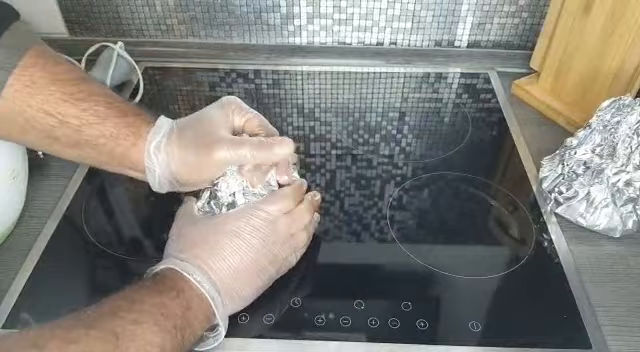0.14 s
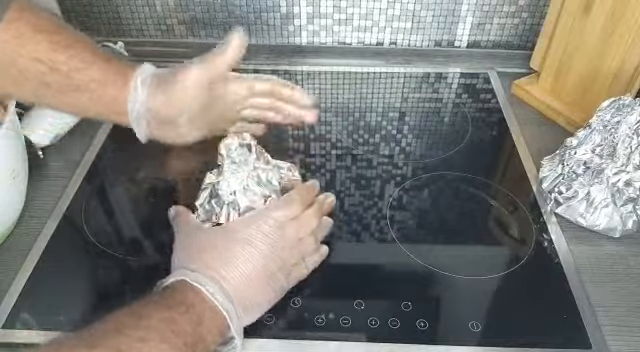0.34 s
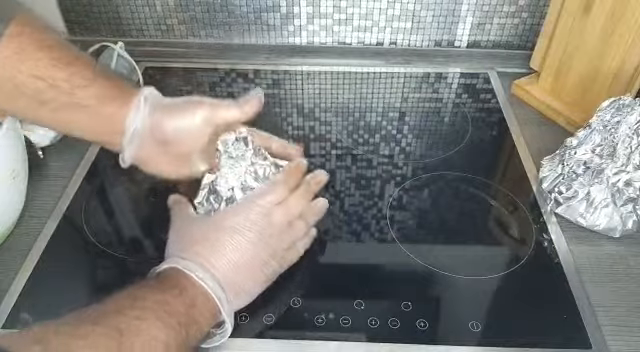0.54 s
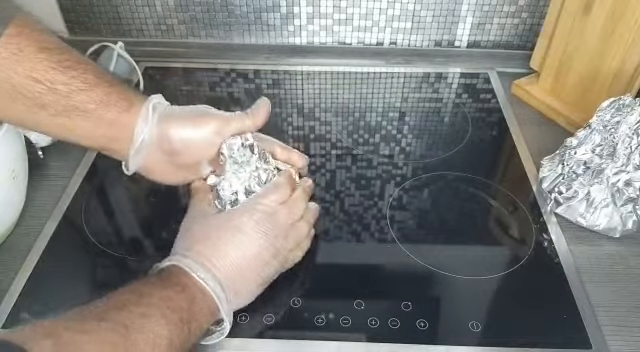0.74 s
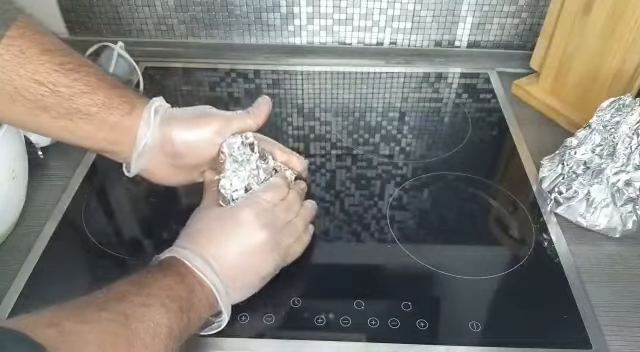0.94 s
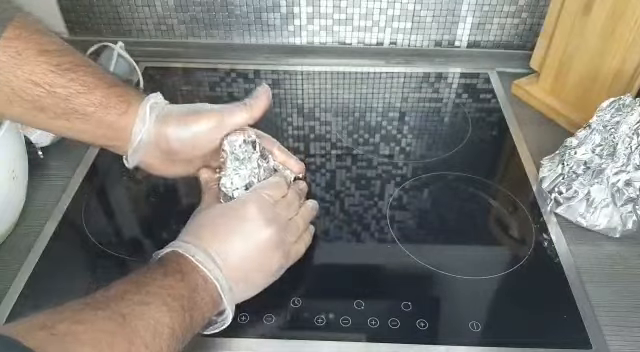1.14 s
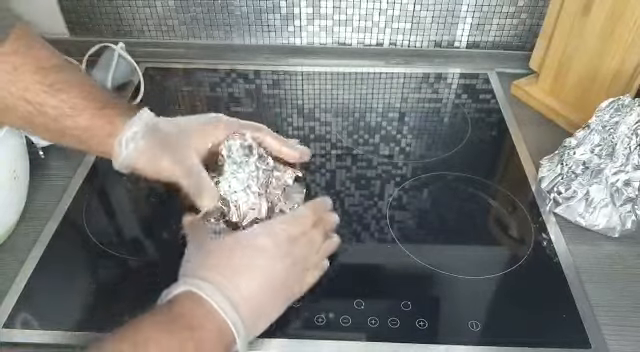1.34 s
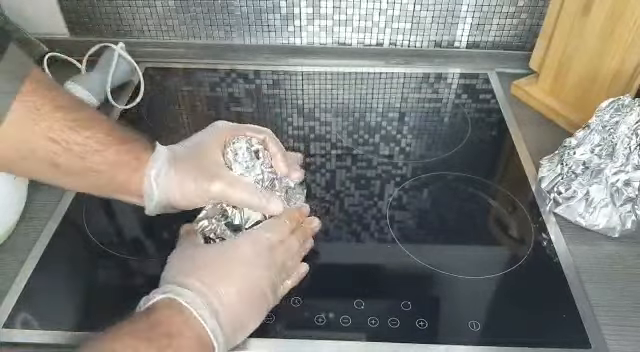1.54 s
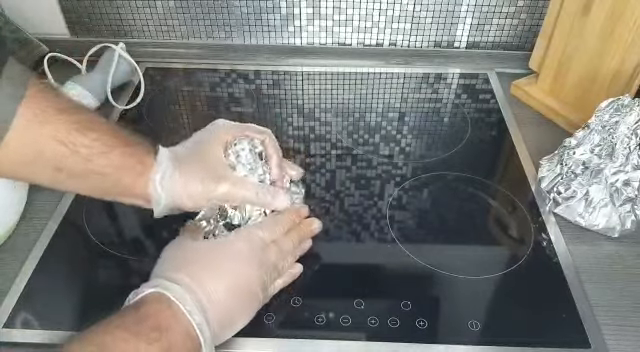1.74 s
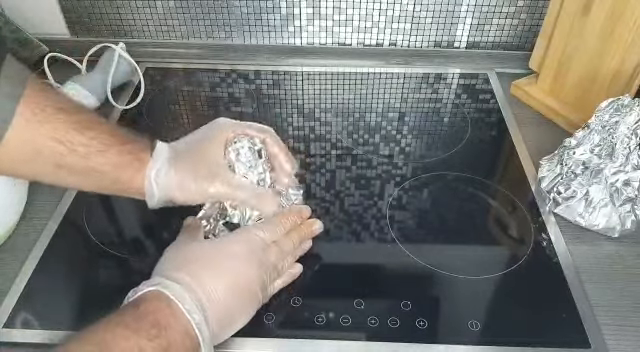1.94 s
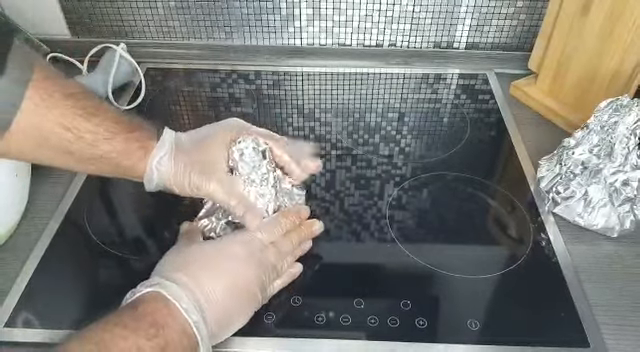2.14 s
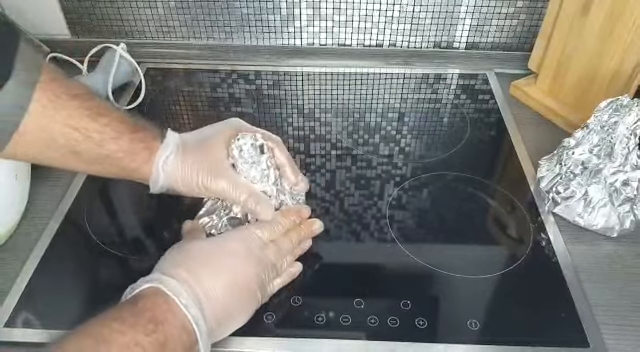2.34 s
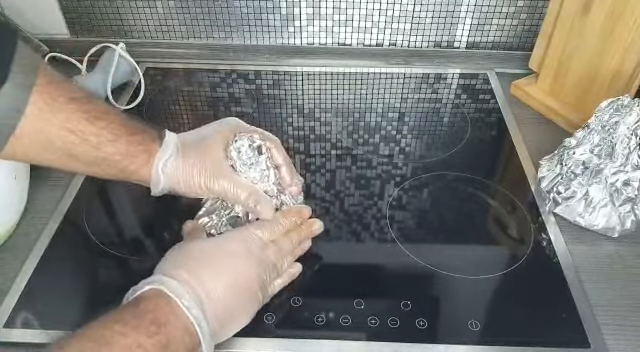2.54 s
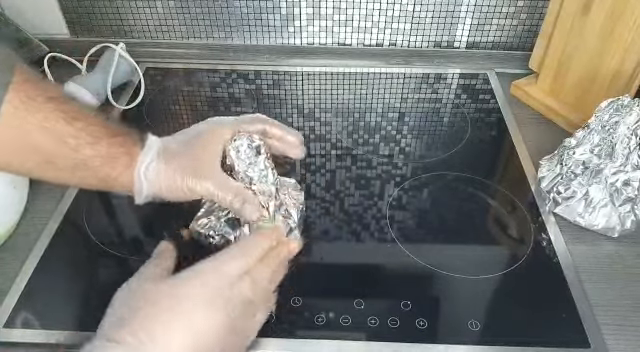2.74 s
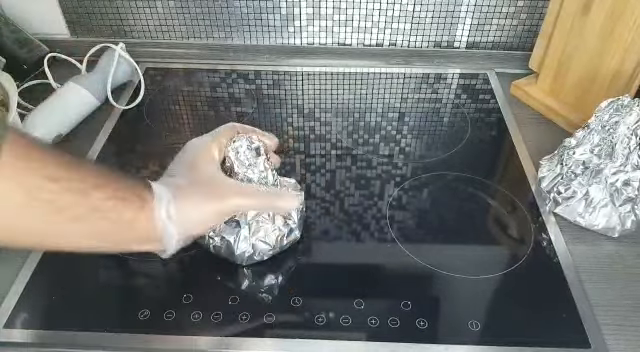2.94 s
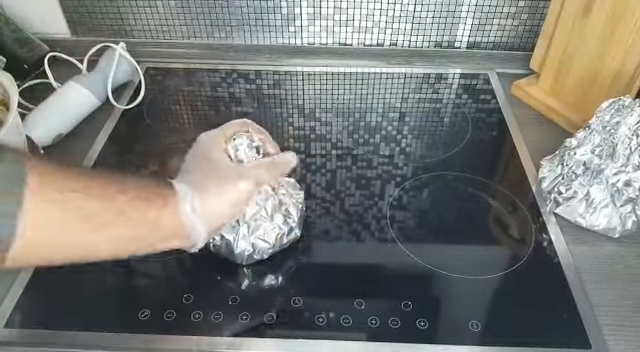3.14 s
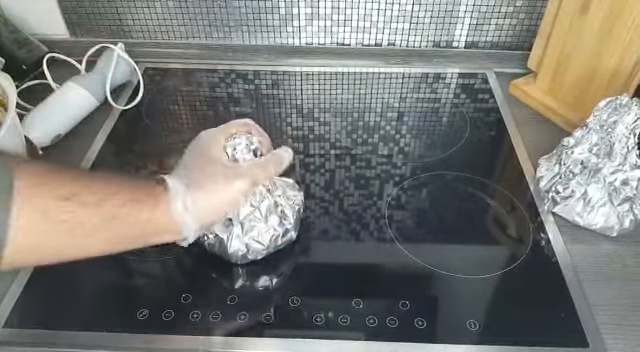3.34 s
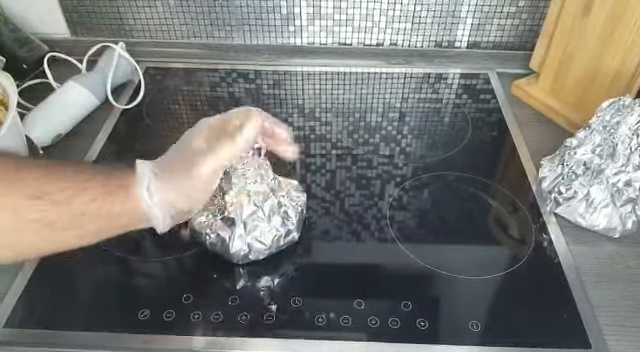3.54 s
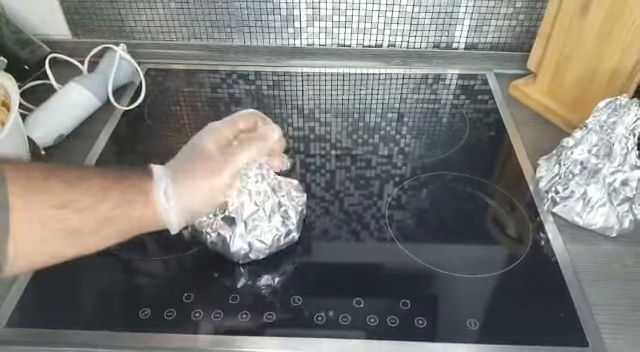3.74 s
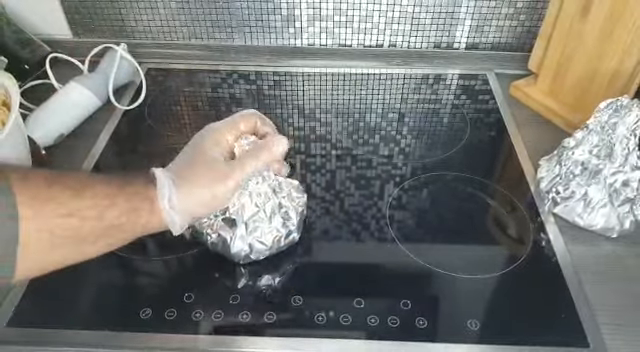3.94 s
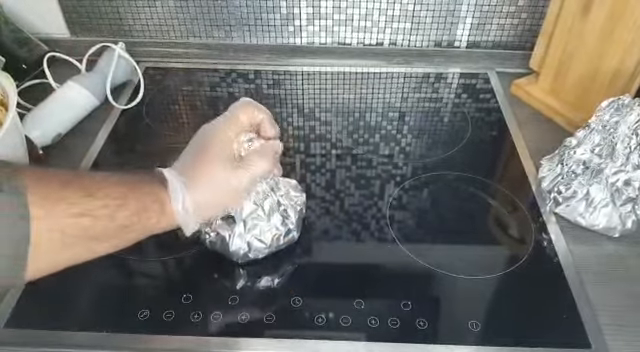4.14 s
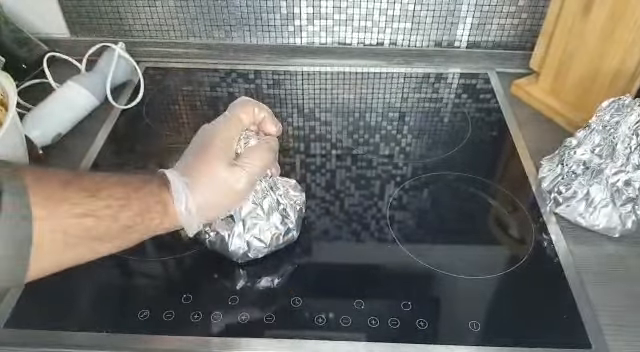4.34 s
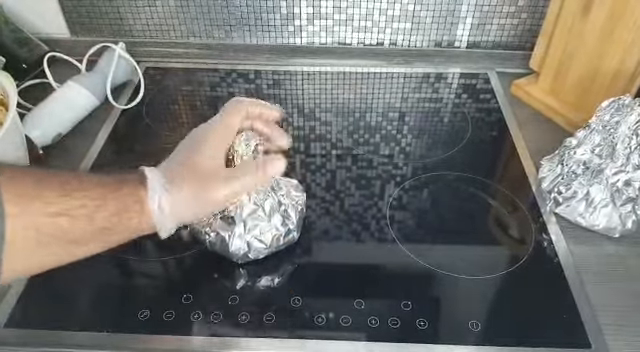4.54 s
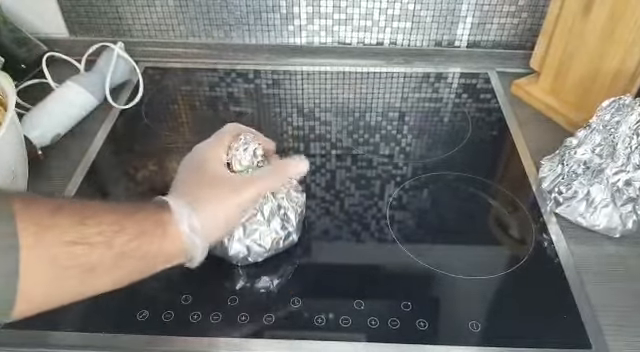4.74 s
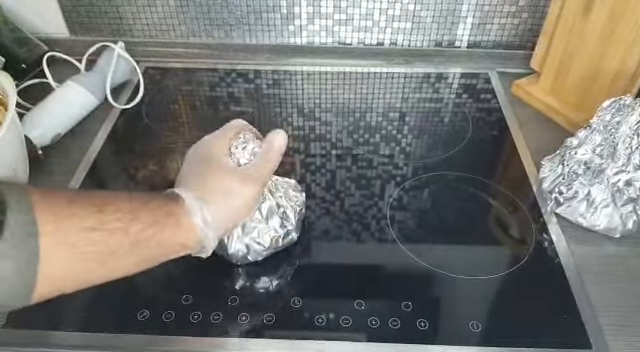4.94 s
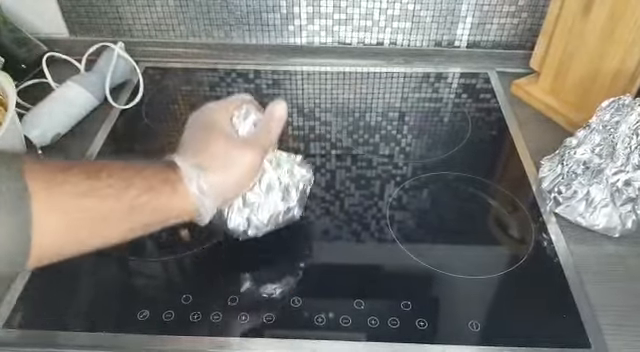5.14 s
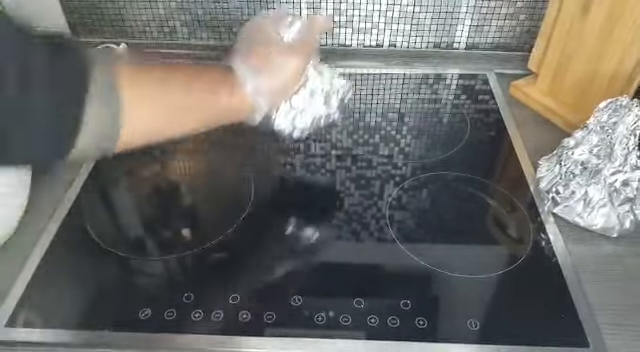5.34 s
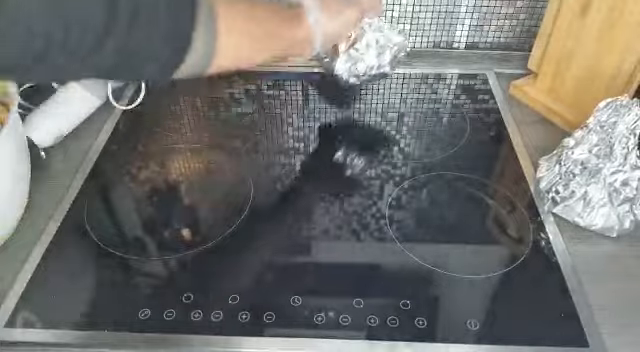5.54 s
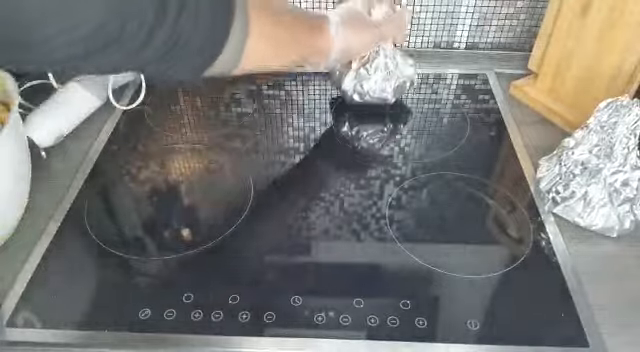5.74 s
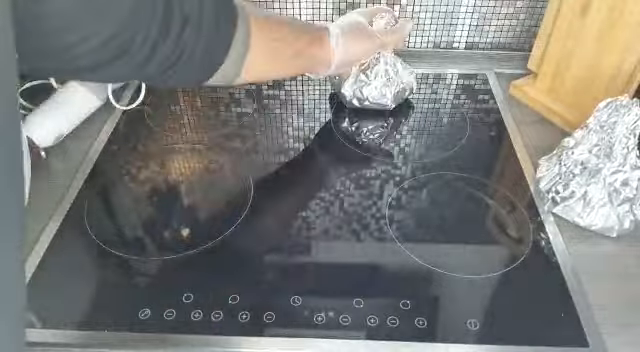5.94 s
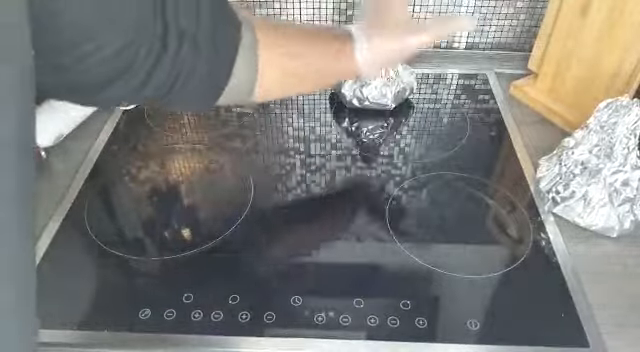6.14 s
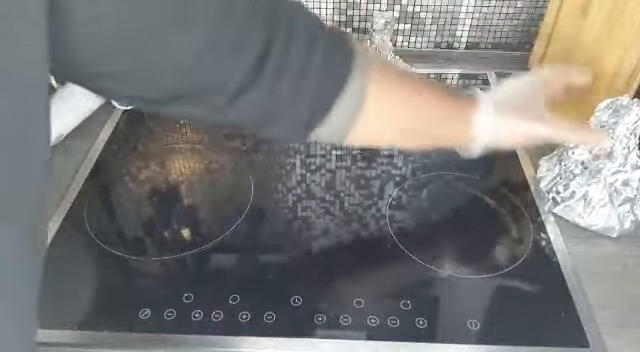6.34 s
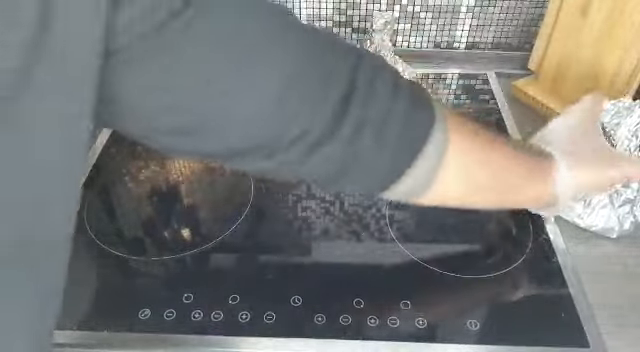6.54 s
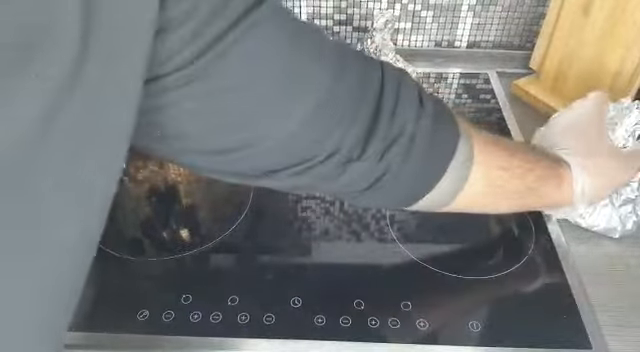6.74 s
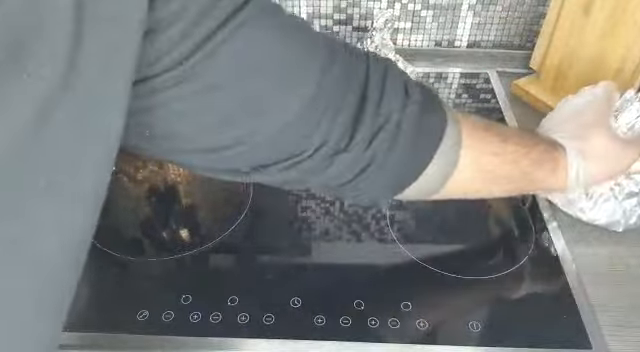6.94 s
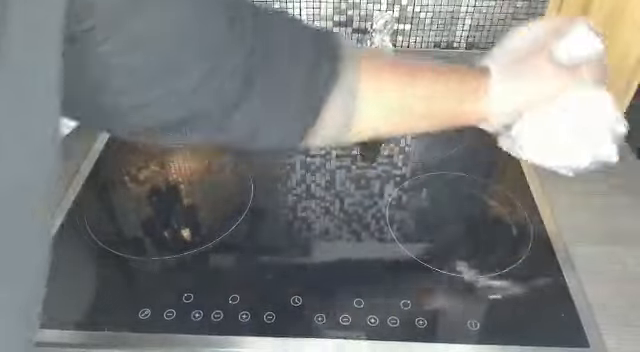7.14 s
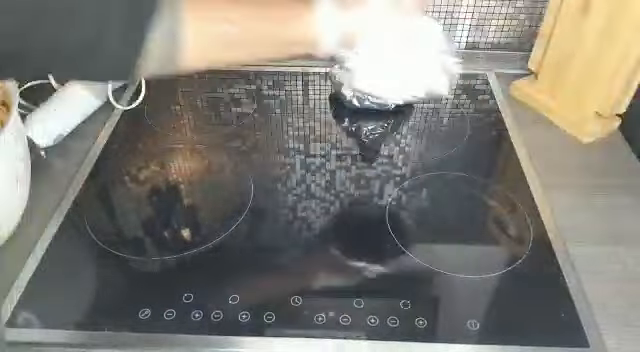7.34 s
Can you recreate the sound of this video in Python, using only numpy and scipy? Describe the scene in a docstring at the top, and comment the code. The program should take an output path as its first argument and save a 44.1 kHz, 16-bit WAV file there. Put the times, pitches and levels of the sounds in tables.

```python
"""A small kitchen: gloved hands press aluminium foil around food on a glass hob, before two microphones.
From the start, tiny facets crackle, whole creases snap, loose sheet flaps and hollows pop, over steady noise
with two faint bands that vary; the hob rumbles under the hands.
Near 5.9 s the parcel lands with one low thump that rings the hob's modes; then a second parcel is picked up
on the right, shifted by delay and balance. Reflections follow; the microphone and recorder limit the band."""
import sys
import numpy as np
from scipy import signal
from scipy.fft import rfft, irfft, next_fast_len
from scipy.io import wavfile
from scipy.ndimage import uniform_filter1d, map_coordinates

SR = 44100
rng = np.random.default_rng(int(sys.argv[2]) if len(sys.argv) > 2 else 0)


def wav_out(sig):
    """Save sig, one row per channel (or a flat mono array), as 16-bit PCM at SR to the path in sys.argv[1]."""
    wavfile.write(sys.argv[1], SR, np.round(np.clip(np.atleast_2d(sig).T, -1, 1) * 32767).astype(np.int16))


N = 325899

# steady background noise: (frequency [Hz], relative density [dB per Hz])
HUSH_SPECTRUM = [(20, -15.5), (35, -2), (65, -4), (130, -5), (200, -18), (320, -10.5), (600, -23.5),
                 (2700, -37), (13000, -30), (16000, -34)]
# faint narrow band of noise near 2.2 kHz: (frequency [Hz], relative density [dB per Hz])
HIGH_BAND_SPECTRUM = [(100, -6), (300, -14.5), (700, -28.5), (1600, -21.5), (2000, -10.5), (2200, 2.5),
                      (2450, -7.5), (2800, -23), (16000, -14.5)]
# its rise and fall in the background: (time [s], level [dB])
HIGH_BAND_LEVEL = [(0, -62), (1.5, -69), (3, -65), (4.3, -68.5), (4.8, -88), (5.8, -75.5), (6.3, -93.5),
                   (6.6, -91), (7.39, -72.5)]
# faint low band of noise near 410 Hz: (frequency [Hz], relative density [dB per Hz])
LOW_BAND_SPECTRUM = [(150, -27), (240, -7), (330, -10.5), (410, 2), (480, -3), (580, -22.5), (900, -23)]
# how it swells and fades: (time [s], level [dB])
LOW_BAND_LEVEL = [(0.4, -74), (1.0, -61), (1.4, -62), (1.7, -84), (2.6, -86), (3.1, -70.5), (3.7, -85),
                  (3.95, -73.5), (4.15, -59.5), (4.55, -68), (4.8, -88), (5.8, -73.5), (6.3, -91),
                  (7.39, -78.5)]
# how long the room rings: (frequency [Hz], t60 [s])
ROOM_T60 = [(80, 0.37), (400, 0.42), (1000, 0.25), (3000, 0.27), (7000, 0.22), (15000, 0.16)]
# hob rumble: (frequency [Hz], relative density [dB per Hz])
RUMBLE_SPECTRUM = [(25, -15), (45, 1.5), (65, 5), (100, -1), (160, -11.5), (300, -19.5), (600, -39)]
# hands lean on the parcel and rock it on the hob: (time [s], held for [s], rumble [dB])
LEANS = [(.66, .7, -65.5), (1.68, .15, -66), (1.94, .1, -56.5), (2.43, 0.24, -63), (3.33, 0.024, -54.5),
         (3.46, .07, -61), (3.8, 0.045, -67), (4.27, 0.026, -63), (5.17, 0.055, -53), (5.35, .04, -63)]
# modes of the hob in its worktop: (frequency [Hz], relative level [dB], t60 [s])
HOB_MODES = [(69.6, -15, 0.16), (86.7, -9.5, 0.36), (114, 1.5, 0.095), (149, -11.5, 0.093),
             (180.5, -34, 0.18), (297, -6, 0.096), (326, -27, .24), (394, -21, 0.26), (487, -18.5, 0.12),
             (600, -19, 0.19), (732, -10, 0.14), (793, -16.5, 0.13), (856, -15, 0.056)]
# the parcel lands and settles: (time [s], relative level [dB], contact time [s])
BLOWS = [(5.8894, -20.5, 0.00095), (5.944, -25, 0.0019)]
# the hollow of the parcel pops: (time [s], level [dB], ring frequency [Hz], t60 [s])
POPS = [(0.102, -25, 920, 0.024), (0.714, -35, 840, 0.018), (2.081, -28.5, 1340, 0.027),
        (2.151, -33, 2130, 0.028), (2.219, -27, 855, 0.056), (2.778, -34, 1150, 0.03),
        (4.826, -54, 980, 0.042)]
# where the foil is: (time [s], lag of the left microphone [samples], left-right balance [dB])
FOIL_PLACE = [(0, -3.5, -2.5), (1.2, -4, -2), (1.8, -3.5, -2.5), (5.2, -3.5, -2.5), (5.9, 2.5, -3),
              (6.6, 12.5, -4.5), (7.0, 11, -3), (7.25, 4, -2.5)]
# average sound of one buckling facet: (frequency [Hz], relative density [dB per Hz])
FACET_SPECTRUM = [(150, -42), (300, -22.5), (480, -15.5), (660, -11), (850, -1.5), (1100, -1.5),
                  (1450, -0.56), (2100, 0), (3000, 0.8), (4200, 1.3), (5500, 1.64), (7500, -0.5),
                  (9500, -3), (12000, 0.5), (15300, -4), (16300, -39)]
# a bending sheet: (frequency [Hz], relative density [dB per Hz])
FLEX_SPECTRUM = [(100, -19), (220, -12), (350, 1), (480, 1), (620, 1.5), (900, -12.5), (2000, -49)]
# how far the loose outer sheet bends: (time [s], level against the grip's crackle control [dB])
SLACK = [(0, -29.5), (0.8, -28.5), (1.2, -30), (1.8, -29.5), (2.2, -32), (2.6, -27), (3.2, -30),
         (3.33, -25.5), (3.5, -44), (4.8, -44), (5.2, -31), (5.5, -30), (6.8, -33), (7.0, -19.5),
         (7.39, -31)]
# creases that snap through: (time [s], burst level [dB], large facets [dB], tiny facets [dB],
# relative duration of the collapse [s before stretching])
SNAPS = [(.0529, -27.5, 7, 8, 0.0031), (.1397, -30, -12, -19, .0016), (.1825, -30, 10, 7.5, 0.0023),
         (.3305, -33, 9.5, 14, 0.0026), (.646, -32, -6, 12, 0.0023), (.7115, -33.5, 34, 5, 0.0013),
         (.7805, -30, 12.5, 10.5, 0.0023), (.858, -29, 9, 5, 0.00053), (.9075, -30.5, -8, 8, 0.0031),
         (.9255, -24.5, -7, -10, 0.0018), (.9753, -28.5, 1, 0, 0.00061), (1.0225, -30.5, 4, -41, 0.0011),
         (1.2483, -34, -10, -7, 0.00058), (1.6624, -31.5, -4, -13, .0017), (1.703, -34.5, -6, 14, .0008),
         (1.8042, -30, 11, 22, .0011), (1.8115, -26, -24, 16, .0005), (1.8742, -33, -5, 4, .0014),
         (1.9201, -30.5, -33, -34, 0.00054), (1.9471, -31.5, -16, -9, 0.0024),
         (2.0769, -26.5, 7.5, 1.5, .0024), (2.148, -40, 1, -4, .0029), (2.187, -37, -11, -2, 0.0019),
         (2.2196, -37, 5, -6, .0027), (2.2763, -43.5, -44, -15, 0.001), (2.3468, -39, -2, -3, 0.0013),
         (2.414, -31.5, 9, 18, 0.00097), (2.425, -33, -25, 1, 0.00052), (2.4694, -34.5, -11, 1, .0029),
         (2.5027, -31.5, 3, 7.5, 0.0016), (2.5746, -31, 2, 7.5, 0.00078),
         (2.5944, -33.5, -13.5, -2.5, 0.00068), (2.7243, -45, 1, 8, .0014), (2.7443, -40, -3, 11.5, .0006),
         (2.7797, -34, 8.5, 0, 0.0015), (3.0735, -49, -11, 20, .0009), (3.215, -34.5, -7, -3, 0.0029),
         (3.2656, -35.5, -11, 21, 0.0012), (3.343, -36.5, -49, -4, 0.0015), (3.4345, -44.5, 5, 5, 0.0013),
         (3.5776, -41.5, -20, 1, 0.002), (3.6657, -56, -13, -2, 0.0012), (3.8014, -37, -1.5, 2.5, .0015),
         (3.8603, -44.5, -25, -5, 0.0016), (3.8926, -38.5, -6, -15, 0.0015),
         (4.0676, -44.5, 4, 12, 0.00087), (4.1166, -37, -12, 31, .0006), (4.3648, -36.5, -16, 15, 0.00074),
         (4.4422, -42, -16, -5, 0.0031), (4.5151, -42, -4, 10, 0.00069), (4.5332, -41.5, -29, 6, 0.00035),
         (4.6402, -40.5, 8.5, 5.5, 0.0015), (4.7899, -55, 9, 26, 0.001), (4.827, -44, -35, 9, .0013),
         (4.975, -40, -39, 1, 0.0024), (5.0209, -34, -10, 4.5, 0.00093), (5.074, -39, -15, 22, .0008),
         (5.1504, -41, -6, 11, 0.0011), (5.1572, -37, 2, 11, .0005), (5.255, -37.5, -25, 0, .0006),
         (5.273, -39.5, -8, 4, 0.0023), (5.3561, -50, -8, -4, 0.001), (5.4466, -54.5, -34, -4, 0.0018),
         (5.479, -48, -34, 3, 0.00087), (5.504, -38.5, -37, -2, 0.0016), (5.709, -55.5, -40, -10, 0.00095),
         (6.1086, -42.5, -7, -4, 0.0029), (6.6, -60, -5, 2, .003), (6.7018, -43.5, -3, -8, 0.0017),
         (6.7204, -41, 1, -4, 0.0028), (6.8195, -31, -19, 10, 0.00044), (6.8485, -31.5, 8, 5, 0.003),
         (6.8832, -29.5, -17, -1, .0019), (7.1458, -50, -9, -13, 0.0011), (7.2094, -38.5, -8, 13, 0.0018),
         (7.228, -37.5, -19, -10, .0006), (7.255, -39.5, 11, 7, .001), (7.3347, -37.5, 1, -5, 0.0014),
         (7.362, -37, -34, -7, 0.0013)]
# each grip on the foil: (time [s], held for [s], crackle level before trim [dB], change while held [dB],
# letting go [dB per s], large dull facets [dB], tiny bright facets [dB])
GRIPS = [(0.002, 0.18, -32, -13, 198, 0.5, -1), (0.269, 0.055, -33, -0.5, 332, 0.5, -1.0),
         (0.579, 0.015, -59.5, 0, 280.0, 1, -3), (0.66, 0.019, -39.0, -9, 289, 3.5, 2.5),
         (0.714, 0.322, -31.5, 0, 148, 1, 0), (1.12, 0.096, -42.5, -1, 150, 1, -5.5),
         (1.259, 0.037, -38.5, 3.5, 336, 3.5, -1.5), (1.559, 0.074, -49, 1.5, 270.0, 10.5, 1.5),
         (1.662, 0.057, -32, -3.5, 281, 0.5, 1.5), (1.778, 0.26, -36, -8, 117, 2, -1),
         (2.214, 0.041, -43.5, -9, 192.5, -3, -0.5), (2.313, 0.085, -47.0, 6, 262.5, 3.0, 1),
         (2.417, 0.18, -42, -5.5, 174, 2, 0.0), (2.723, 0.073, -44, 2.5, 217, -3.5, 0.0),
         (2.964, 0.122, -56.0, 9, 250.0, -5, 3.5), (3.11, 0.129, -47.0, 3, 240.0, 1, -1.5),
         (3.267, 0.09, -39.5, 5, 258, -4.5, 2.0), (3.466, 0.046, -39, 9, 267, 0, 2.5),
         (3.672, 0.041, -52.5, 0, 272, -8, 0.0), (3.734, 0.057, -42.5, -3.5, 155, -1.5, 0.5),
         (3.9, 0.015, -49.5, -4.5, 140.0, -1, -6.0), (4.072, 0.3, -46, 0.5, 110.0, -1.5, 2.5),
         (4.559, 0.079, -43.0, -7, 370.0, -3.5, -1.5), (4.779, 0.17, -55.5, 9.5, 250.0, 0.5, 8.5),
         (4.982, 0.192, -46.5, 4, 270.0, -3.5, 0.5), (5.21, 0.047, -41, -7, 178, 0.5, -0.5),
         (5.463, 0.12, -52, 11.5, 190.5, -13.5, 1), (5.701, 0.25, -68.5, -4, 281, -3.5, 0),
         (5.958, 0.093, -62, -3, 270.0, 2.0, -2), (6.063, 0.037, -50.0, 4.5, 262, -2.5, 3),
         (6.615, 0.13, -59.0, -7, 270.0, 0.0, -3.5), (6.722, 0.1, -36.5, 1.5, 270.0, -3, -0.5),
         (6.812, 0.25, -36.5, -3, 202, 5, 1.5), (7.215, 0.046, -42.5, -1, 350.0, -2.5, -1),
         (7.315, 0.072, -49.5, -4, 270.0, -7, 3)]

TAPS = 1024  # length of one click [samples]
HZ = np.fft.rfftfreq(TAPS, 1 / SR)
TICKS = np.arange(0, N + 64, 64) / SR  # times at which slow controls are worked out [s]
EDGE_HZ = 16300  # upper band limit
MIDDLING_DB = -40  # crackle control of a middling grip
CLOSE_DB_PER_S = 596  # how fast the crackle swells as a hand closes
SETTLE_DB, SETTLE_DB_PER_S = -17, 97  # the creases go on ticking for a moment after each grip
# the foil crunches at once as the parcel lands
JOLT_DB, JOLT_RISE_DB_PER_S, JOLT_FALL_DB_PER_S = -39.5, 12000.5, 330
# the facets around a crease crackle just before and after it snaps
STIR_DB, STIR_RISE_DB_PER_S, STIR_FALL_DB_PER_S = -7.5, 1299, 797.5
LEAN_DB_PER_S, UNLEAN_DB_PER_S = 350, 140  # how fast the rumble of a lean comes and goes
RUB_DB, RUB_FOLLOWS = -71, .3  # rumble of a middling grip, and its dB per dB of crackle


def gain_of(db):
    """Decibels to amplitude."""
    return 10 ** (np.asarray(db) / 20)


def evened(x):
    """Scales to an rms of one."""
    return x / np.sqrt(np.mean(x ** 2) + 1e-20)


def read(points, hz):
    """A curve over frequency, joined by straight lines over log frequency."""
    f, value = np.transpose(points)
    return np.interp(np.log(hz + 1), np.log(f + 1), value)


def follow(rows):
    """Each column of a curve over time, at every sample."""
    s, *columns = np.transpose(rows)
    return [np.interp(np.arange(N) / SR, s, c) for c in columns]


def sampled(control):
    """A slow control at every sample."""
    return np.interp(np.arange(N) / SR, TICKS, control)


def held(start, length, rise, fall, change_db=0):
    """Attack, hold and release in dB; rise and fall are in dB per second."""
    t = TICKS - start
    attack = rise * np.minimum(t, 0)
    hold = change_db * (np.clip(t / length, 0, 1) - .5)
    return attack + hold - fall * np.maximum(t - length, 0)


def add(mix, s, sound):
    """Mixes a sound in at time s."""
    part = mix[max(round(s * SR), 0):][:len(sound)]
    part += sound[:len(part)]


def coloured(x, db_at):
    """Filters a long signal by a gain in dB that depends on frequency."""
    size = next_fast_len(N + TAPS)
    gain = gain_of(db_at(np.fft.rfftfreq(size, 1 / SR)))
    return irfft(rfft(x, size) * gain, size)[..., :N]


def noise(points, apart):
    """Stereo noise of a given spectrum; apart scales the part that the two sides do not share."""
    white = rng.standard_normal((3, N))
    shared, left, right = coloured(white, lambda hz: read(points, hz))
    return evened(shared + apart * np.array([left, right]))


def background():
    """Steady background noise, with two faint noise bands near 400 Hz and 2.2 kHz whose levels vary."""
    high_band = gain_of(follow(HIGH_BAND_LEVEL)[0]) * noise(HIGH_BAND_SPECTRUM, apart=1.0)
    low_band = gain_of(follow(LOW_BAND_LEVEL)[0]) * noise(LOW_BAND_SPECTRUM, apart=1.0)
    return gain_of(-72.5) * noise(HUSH_SPECTRUM, apart=0.95) + high_band + low_band


def echoes(early_db, tail_db, early_t60=0.039):
    """Quick reflections from hob and tiles, then the short tail of the room."""
    t = np.arange(SR // 2) / SR
    shape = (2, len(t))
    taps = rng.standard_normal(shape) * (rng.random(shape) < 5000 / SR) * (t > .005)
    # each frequency of the tail dies away at its own rate
    hz, s, z = signal.stft(taps, SR, nperseg=256)
    fading = z * gain_of(-60 * s / read(ROOM_T60, hz)[:, None])
    tail = signal.istft(fading, SR, nperseg=256)[1][:, :len(t)]
    early = rng.choice([-1, 1], shape) * (rng.random(shape) < 3000 / SR) * (t > .0005)
    early = early * gain_of(-60 * t / early_t60)
    return sum(gain_of(db) * part / np.linalg.norm(part, axis=1, keepdims=True)
               for db, part in [(early_db, early), (tail_db, tail)])


def echoed(x, early_db, tail_db):
    """A sound from one fixed place, with its reflections."""
    return x + signal.oaconvolve(x, echoes(early_db, tail_db), axes=1)[:, :N]


def kitchen(x, early_db, tail_db, count=12, size=700):
    """Facets face every way, so one after another they reach the walls by different paths."""
    out = x.copy()
    for k in range(count):
        # each set of echoes takes its turn, crossfading over size samples
        distance = abs((np.arange(N) / size - k + count / 2) % count - count / 2)
        turn = np.cos(np.pi / 2 * np.minimum(distance, 1))
        out += signal.oaconvolve(x * turn, echoes(early_db, tail_db), axes=1)[:, :N]
    return out


def rocking(squeeze_db):
    """The hob rumbles a little under every grip, and more when the hands lean on the parcel."""
    leans = sampled(sum(gain_of(db + held(s, length, LEAN_DB_PER_S, UNLEAN_DB_PER_S)) ** 2
                        for s, length, db in LEANS))
    rub = gain_of(RUB_DB + RUB_FOLLOWS * (squeeze_db - MIDDLING_DB))
    rumble = noise(RUMBLE_SPECTRUM, apart=0.45) * np.sqrt(leans + rub ** 2)
    return rumble * gain_of([[-1.5], [1.5]])


def thump(thud_db=-18, thud_t60=0.3, low_hz=170, high_hz=760):
    """The soft, heavy parcel pushes on the hob, whose modes ring under a dull thud."""
    t, out = np.arange(SR * 3 // 4) / SR, np.zeros(N)
    ring = sum(gain_of(db - 60 * t / t60) * np.sin(2 * np.pi * hz * t) for hz, db, t60 in HOB_MODES)
    band = signal.butter(3, [low_hz, high_hz], "band", fs=SR, output="sos")
    for s, db, contact in BLOWS:
        push = t * np.exp(-4 * t / contact)  # a longer contact gives a duller blow
        thud = evened(signal.sosfilt(band, rng.standard_normal(len(t))))
        body = ring + thud * gain_of(thud_db - 60 * t / thud_t60)
        add(out, s, gain_of(db) * signal.fftconvolve(body, push / push.sum()))
    return out


def landing(width=0.5):
    """The thump fills the room, but such long waves reach both microphones much alike."""
    wide = echoed(thump()[None], early_db=-11, tail_db=-9)
    middle = wide.mean(axis=0)
    return (middle + width * (wide - middle)) * gain_of([[-2], [1.5]])


def pops():
    """A broad panel flips and the hollow under it rings briefly with two close modes."""
    out, t = np.zeros(N), np.arange(SR // 5) / SR
    for s, db, hz, t60 in POPS:
        ring = sum(share * np.sin(2 * np.pi * hz * ratio * t)
                   for ratio, share in [(1, 0.78), (1.16, -0.38)])
        add(out, s, gain_of(db - 60 * t / t60) * ring)
    return out


def hands():
    """Crackle level and the share of large and tiny facets, in dB; the strongest grip rules."""
    squeeze_db = JOLT_DB + held(BLOWS[0][0], .01, JOLT_RISE_DB_PER_S, JOLT_FALL_DB_PER_S)
    folds_db = np.zeros((2, len(TICKS)))
    for start, length, db, change_db, let_go, large, tiny in GRIPS:
        grip = held(start, length, CLOSE_DB_PER_S, let_go, change_db)
        settling = SETTLE_DB + held(start, length, CLOSE_DB_PER_S, SETTLE_DB_PER_S, change_db)
        grip_db = db + np.maximum(grip, settling)
        folds_db = np.where(grip_db > squeeze_db, [[large], [tiny]], folds_db)
        squeeze_db = np.maximum(squeeze_db, grip_db)
    for s, db, *_ in SNAPS:
        stir_db = db + STIR_DB + held(s, 0.0032, STIR_RISE_DB_PER_S, STIR_FALL_DB_PER_S)
        squeeze_db = np.maximum(squeeze_db, stir_db)
    smooth_folds = uniform_filter1d(folds_db, size=14)
    return sampled(squeeze_db), [sampled(share) for share in smooth_folds]


def flex(squeeze_db, level_db=0, per_s=350, size_db=0.0):
    """Broad, loose parts of the sheet flip with soft, low flaps."""
    happens = rng.random(N) < per_s / SR
    sizes = gain_of(size_db * np.minimum(rng.exponential(1, N), 3))
    flaps = happens * rng.choice([-1, 1], N) * sizes
    sound = evened(signal.oaconvolve(flaps, click(read(FLEX_SPECTRUM, HZ)))[:N])
    return sound * gain_of(level_db + squeeze_db + follow(SLACK)[0])


def click(db):
    """The sharpest causal click that has this spectrum: its minimum-phase response."""
    log_gain = np.log(gain_of(np.concatenate([db, db[-2:0:-1]])))
    return np.fft.ifft(np.exp(np.conj(signal.hilbert(log_gain)))).real


def size_shares(hz, low_hz=1800, high_hz=7000):
    """How much of each frequency comes from large and from tiny facets."""
    return 1 / (1 + (hz / low_hz) ** 4), 1 - 1 / (1 + (hz / high_hz) ** 4)


def facet(uneven_db, count=70):
    """Spectrum of one facet: the foil's colour with chance resonances of its own."""
    knots = np.linspace(0, 1, count)
    bumps = np.interp(np.sqrt(HZ / HZ[-1]), knots, rng.standard_normal(count))
    return read(FACET_SPECTRUM, HZ) + uneven_db * bumps


def aimed(x, scatter):
    """Spreads a facet's sound unevenly over the two microphones."""
    lean, lag = rng.standard_normal(2)
    hz = np.fft.rfftfreq(len(x), 1 / SR)
    turn = np.exp(scatter * (0.43 * lean + 1j * lag * hz / 9000))
    return irfft(rfft(x) * np.array([turn, 1 / turn]), len(x))


def crackle(squeeze_db, folds_db, level_db=-3, per_s=2200, busier_db=0.46, size_db=3.0, clump_db=3.0,
            uneven_db=5, scatter=1.0, count=28):
    """Facets buckle in little avalanches, more often and more loudly as the hands squeeze."""
    knots = np.arange(0, N, 2 ** 8)
    clumps = np.interp(np.arange(N), knots, rng.standard_normal(len(knots)))
    # per_s is the rate in a middling grip
    happens = rng.random(N) < per_s / SR * gain_of(busier_db * (squeeze_db - MIDDLING_DB))
    # many small buckles, a few large ones; together they spend the work that the hands put in
    strength_db = size_db * np.minimum(rng.exponential(1, N), 4) + clump_db * clumps
    sizes = happens * rng.choice([-1, 1], N) * gain_of(strength_db)
    sizes *= gain_of(squeeze_db) / np.sqrt(abs(uniform_filter1d(sizes ** 2, size=1100)) + .002)
    which, out = rng.integers(0, count, N), np.zeros((2, N))
    for k in range(count):
        ring = aimed(np.roll(click(facet(uneven_db)), 8), scatter)
        ring = ring / np.sqrt(np.sum(ring ** 2) / 2)
        out += signal.oaconvolve((sizes * (which == k))[None], ring, axes=1)[:, :N]
    # the size of the folds shifts energy between low and high, with the overall level compensated
    large = coloured(out, lambda hz: 20 * np.log10(size_shares(hz)[0] + 1e-9))
    tiny = coloured(out, lambda hz: 20 * np.log10(size_shares(hz)[1] + 1e-9))
    large_gain, tiny_gain = gain_of(folds_db)
    folded = out + (large_gain - 1) * large + (tiny_gain - 1) * tiny
    energy = 0.56 + 0.054 * large_gain ** 2 + 0.45 * tiny_gain ** 2
    return gain_of(level_db) * folded / np.sqrt(energy)


def reshaped(x, patchy_db, size=256):
    """The creases keep moving, so the foil's resonances shift from moment to moment."""
    frames = dict(nperseg=2 * size, noverlap=3 * size // 2)
    z = signal.stft(x, **frames)[2]
    patches = uniform_filter1d(rng.standard_normal(z.shape[1:]), size=6, axis=0)
    patches = evened(uniform_filter1d(patches, size=6, axis=1))
    return signal.istft(z * evened(gain_of(patchy_db * patches)), **frames)[1][:, :N]


def small_creases(squeeze_db, db=-43, follows=0.93, spread_db=2.5, large_db=-6, tiny_db=5, colour_db=7,
                  collapse_s=.0009, count=110):
    """Lesser creases give way at chance moments, stronger as the hands squeeze; rows like SNAPS."""
    when = (np.arange(count) + rng.random(count)) / count * (N - 1)
    strength, large, tiny, slow = rng.standard_normal((count, 4)).T
    level = db + follows * (squeeze_db[when.astype(int)] - MIDDLING_DB) + spread_db * strength
    large_levels = large_db + colour_db * large
    tiny_levels = tiny_db + colour_db * tiny
    return list(zip(when / SR, level, large_levels, tiny_levels, collapse_s * np.exp(.5 * slow)))


def snaps(creases, level_db=0, uneven_db=5, stretch=1.1, scatter=1.0, order=10, span=0.0059):
    """A crease gives way: a first facet flips and pulls its neighbours along within milliseconds."""
    out, (large, tiny) = np.zeros((2, N)), size_shares(HZ)
    for s, db, large_db, tiny_db, duration in creases:
        burst = np.zeros((2, 2 * TAPS))
        waits = np.minimum(rng.exponential(1, order), 4) * (np.arange(order) > 0)
        for wait, sign in zip(waits, rng.choice([-1, 1], order)):
            spectrum = facet(uneven_db) + large_db * large + tiny_db * tiny
            ring = aimed(np.roll(click(spectrum), 8), scatter)
            # the later a neighbour follows, the weaker it is
            for side in range(2):
                add(burst[side], wait * duration * stretch, sign * np.exp(-.4 * wait) * ring[side])
        # the level is the burst's rms over span seconds
        burst *= gain_of(db + level_db) * np.sqrt(span * SR / (np.sum(burst ** 2) / 2))
        for side in range(2):
            add(out[side], s, burst[side])
    return out


def placed(x):
    """The foil's position sets the delay and balance between the microphones."""
    lag, balance_db = follow(FOIL_PLACE)
    left = map_coordinates(x[0], [np.arange(N) - lag], order=5)
    return np.array([left * gain_of(balance_db / 2), x[1] * gain_of(-balance_db / 2)])


def scene():
    """Foil and hob in a small kitchen, over the background noise."""
    squeeze_db, folds_db = hands()
    creases = snaps(SNAPS) + snaps(small_creases(squeeze_db), order=4)
    facets = reshaped(crackle(squeeze_db, folds_db), patchy_db=2.98)
    sheet = facets + creases + flex(squeeze_db)
    foil = kitchen(placed(sheet), early_db=-1.5, tail_db=-5.5)
    hollow = echoed(pops() * gain_of([[-1], [1]]), early_db=-9, tail_db=-8.5)
    return background() + rocking(squeeze_db) + landing() + hollow + foil


def record(dry, low_cut_hz=52):
    """The microphone's steep bass roll-off and the recorder's band limit."""
    roll_off = signal.butter(5, low_cut_hz, "high", fs=SR, output="sos")
    thin = signal.sosfilt(roll_off, dry)
    band_limit = signal.firwin(511, EDGE_HZ, window=("kaiser", 9), fs=SR)
    return signal.oaconvolve(thin, band_limit[None], "same")


dry = scene()
out = record(dry)
wav_out(out)
```